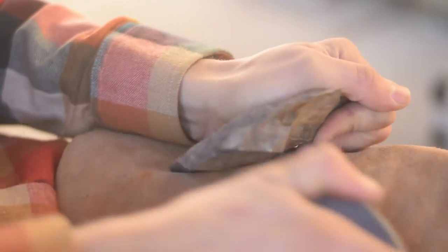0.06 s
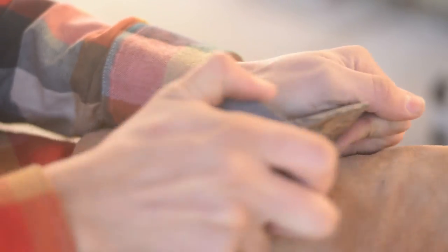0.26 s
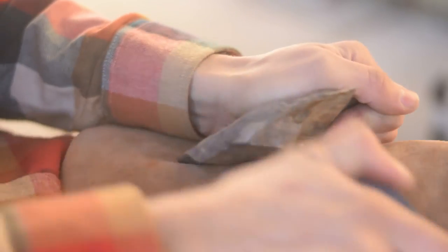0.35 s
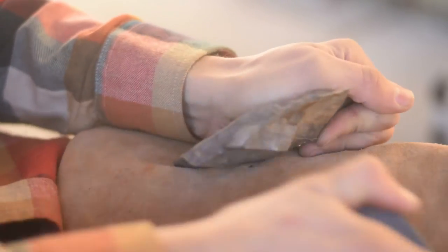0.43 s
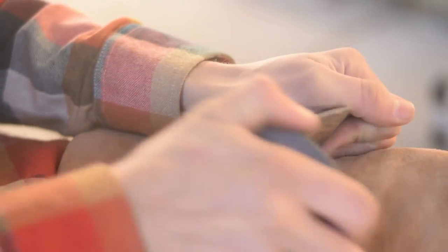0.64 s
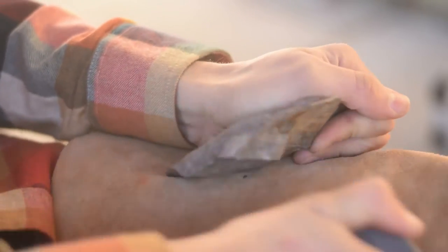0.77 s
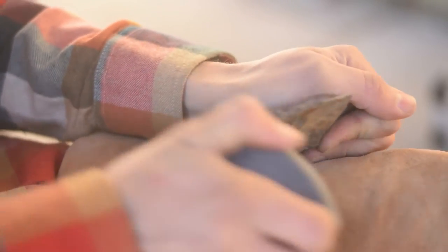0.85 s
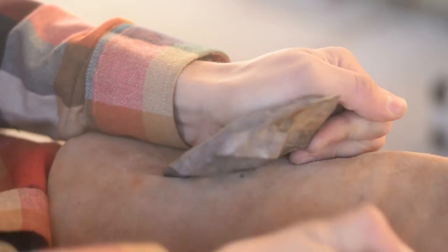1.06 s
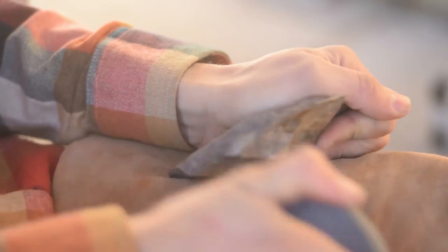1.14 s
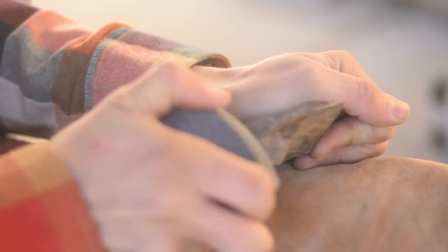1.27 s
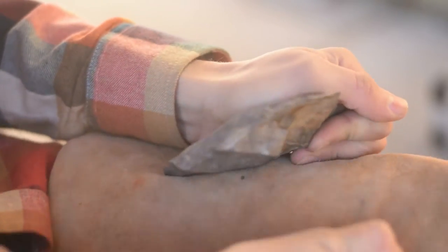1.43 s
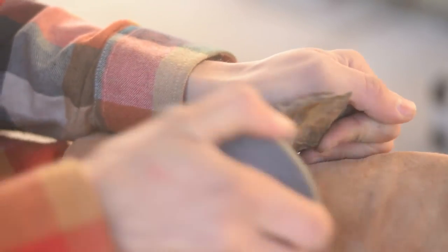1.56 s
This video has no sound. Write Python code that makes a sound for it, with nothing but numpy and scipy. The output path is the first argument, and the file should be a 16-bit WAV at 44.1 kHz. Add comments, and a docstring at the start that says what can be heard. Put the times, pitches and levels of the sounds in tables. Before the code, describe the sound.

A coarse stone knocks and rasps along another stone's edge in four short, gritty strokes, up close

```python
"""A rasp that has just ended leaves its echo in a small room with soft air noise and a low, wavering hum.
Then a coarse hand stone is swept four times along the edge of a stone blank held on the thigh.
Each stroke lands with a knock (short damped tones, overloading the close microphone) and skips lightly.
It then rasps along the edge (thousands of tiny clicks through the stones' resonances), with a few louder
snaps of coarse grains, and slips off with a thin, high ring. The room answers each sound."""
import sys
import numpy as np
from scipy import signal
from scipy.fft import rfft, irfft
from scipy.io import wavfile
from scipy.ndimage import uniform_filter1d

SR = 44100
rng = np.random.default_rng(int(sys.argv[2]) if len(sys.argv) > 2 else 0)


def to_wav(sig):
    """Store sig (one row per channel, or 1-D mono) as 16-bit WAV at the path in sys.argv[1].

    Samples outside -1..1 are clipped; the rate is SR.
    """
    pcm = np.clip(np.atleast_2d(sig), -1, 1) * 32767
    pcm = np.round(pcm).astype(np.int16)
    wavfile.write(sys.argv[1], SR, pcm.T)  # frames by channels


N = 70560
LEAD = SR // 5  # samples made before time zero and cut off at the end
T = np.arange(-LEAD, N) / SR  # time in seconds

# Still air of the room: hz, level_db (only the shape counts)
AIR_COLOUR = [(20, -13), (50, -5.5), (110, 3.5), (170, -1), (250, 0.5), (320, -4.5), (500, -7.5),
              (1000, -12.5), (2000, -12.5), (3500, -12.5), (6000, -20.5), (10000, -20.5), (16000, -27.5)]
# Slow rise and fall of the hum: time_s, level_db
HUM_LEVELS = [(0, -54), (.12, -47.5), (.33, -61), (.5, -46.5), (.68, -59.5), (.88, -39), (1.02, -50),
              (1.22, -43.5), (1.4, -57), (1.6, -46)]
# How long the room rings at each pitch: hz, t60_s (time to fall by 60 dB)
ROOM_DECAY = [(200, 0.1), (600, 0.55), (1800, .42), (4500, 0.39), (8000, 0.29), (13000, 0.097)]
# First contact of each stroke: start_s, level_db, pitch_hz, chink_db
KNOCKS = [(0.2189, 18, 1890, -41), (0.5809, 11, 1750, -12), (.9503, 16, 1853, -34), (1.3016, 17, 1940, -28)]
# Dull tones of the hand-held stones under a knock: pitch_hz, level_db, t60_s
KNOCK_MODES = [(112, -59, 0.01), (626, -38, 0.043), (1180, -28.5, 0.013), (1356, -22, 0.024),
               (3260, -23, 0.016)]
# Light touches between knock and rasp: start_s, length_s, level_db, sizzle_db
SKIPS = [(0.2543, 0.0094, -12, -13.5), (0.278, 0.0044, -23, -12), (0.304, 0.0036, -33, -12),
         (0.582, 0.026, -17, -21), (0.986, 0.004, -33, 0), (1.304, 0.0064, -6, -30),
         (1.332, 0.017, -27.5, -3)]
# Coarse grains that catch on the edge: start_s, level_db
CATCHES = [(0.3144, 2.5), (0.339, 1.5), (.347, -5), (.649, 0), (0.712, 1.5), (0.9912, -2), (1.354, -3),
           (1.373, 0), (1.39, -5)]
# Rasps along the edge: start_s, end_s, rise_s, level_db, force_gain_db, groan_db, grit_db,
# grit_growth_db, hollow_db, hollow_hz, sizzle_db, sizzle_hz, edge_ring_db
SCRAPES = [(-.11, -0.022, 0.013, -14, 1, -20, -14.5, 10, -11, 3350, -21, 7900, -1),
           (0.31, .382, 0.0014, -16, -5, -7, -12, 8, -2, 3247, -10.5, 8010, 1.5),
           (.638, 0.728, .008, -15.5, 1.5, -5.5, -14.5, 20, -10.5, 3240, -17.5, 8180, -4.5),
           (0.98, 1.065, 0.025, -13.5, 1, -12, -17.5, 20, -11, 3220, -14.5, 7870, -3),
           (1.336, 1.423, 0.02, -14.7, -1, -9, -21.5, 26, -9.5, 3270, -19, 7930, 3.5)]
# Sharper resonances of the stones under the rasp: pitch_hz, width_hz, level_db
STONE_MODES = [(584, 55, -23.5), (1558, 37, -15.5), (1863, 133, -10.5), (2480, 22.6, -22)]
# Colour of the rasping stones: hz, level_db
BODY_COLOUR = [(120, -40.5), (250, -17.5), (400, -14), (570, -7.5), (850, -11), (1150, -10), (1350, -14.5),
               (1520, -1), (1800, 0.5), (2150, -4), (2800, -11), (3600, -10.5), (4100, -25.5),
               (5600, -26.5), (9000, -36), (16000, -40)]
# Colour of grit that crumbles toward the end of the edge: hz, level_db
GRIT_COLOUR = [(60, -46), (300, -25), (2000, -2), (4300, 1.5), (5700, -8), (7000, -1.5), (8400, -14.5),
               (9200, -12.5), (10700, -12), (12400, -6), (13200, -18), (16000, -14)]
# Colour of the fine fizz all along the stroke: hz, level_db
FIZZ_COLOUR = [(60, -46), (2000, 1), (5600, -13.5), (6700, 5), (8200, -0.5), (9000, -21.5), (10600, -2),
               (11400, -24), (12100, 3), (13000, -16), (15000, -19), (16000, -11)]

AIR_DB, HUM_HZ, HUM_OCTAVE_DB = -44.5, 88.6, -54
ROOM_DB, ROOM_DELAY_S, EARLY_DB, EARLY_DECAY_S = -21, 0.0064, -15, 0.011
KNOCK_DECAY_S, KNOCK_RISE_S = 0.00057, 0.00008
BOUNCE_S, BOUNCE_DB, BOUNCE_DECAY_S = 0.00284, -21.5, 0.0028
THUMP_DB, THUMP_S, CRACK_DB, CRACK_S = -14, 0.00027, -14.5, 0.00061
CATCH_HZ = 1750
GRAINS_PER_S, GRAIN_SPREAD_DB, JUDDER_DB, JUDDER_S = 12000, 3.5, 2.66, 0.003
RELEASE_S, RASP_LOW_CUT_HZ = 0.00068, 194
BODY_DB, FIZZ_DB, NOTE_FADE_DB = -2.5, -17, 6
GROAN_HZ, GROAN_WIDTH_HZ, GROAN_FADE_DB = 583, 480, -12
HOLLOW_WIDTH_HZ, SIZZLE_WIDTH_HZ = 500, 910
EDGE_RING_HZ, EDGE_WIDTH_HZ, SLIP_S, EDGE_EARLY_DB = 12085, 140, 0.006, -31.5
CLIP_DB, LIMIT_DB, LIMIT_RECOVER_DB_PER_S, LIMIT_LAG_S, CUT_HZ = 4, 5.5, 237, 0.009, 15900


def amp(db):
    """Turns decibels into a plain multiplier."""
    return 10 ** (np.asarray(db) / 20)


def unit(x):
    """Scales a sound to an average strength (rms) of 1."""
    return x / np.sqrt(np.mean(x ** 2) + 1e-20)


def read(points, hz):
    """Reads between the points of a table, spacing frequency as a logarithm."""
    f, value = np.transpose(points)
    return np.interp(np.log(hz + 1), np.log(f + 1), value)


def colour(x, points):
    """Gives a sound the table's tone with a filter of unit energy that never acts ahead of time."""
    log_gain = np.log(amp(read(points, abs(np.fft.fftfreq(4096, 1 / SR)))))
    # the Hilbert transform supplies the phase that makes the filter respond at once
    taps = np.fft.ifft(np.exp(np.conj(signal.hilbert(log_gain)))).real[:2048]
    return signal.fftconvolve(x, taps / np.linalg.norm(taps))[:len(x)]


def ring(x, hz, width_hz, order=1):
    """Lets a sound excite a fading tone of unit energy; a higher order has steeper skirts."""
    t = np.arange(4096) / SR
    taps = t ** (order - 1) * np.exp(-np.pi * width_hz * t) * np.sin(2 * np.pi * hz * t)
    return signal.fftconvolve(x, taps / np.linalg.norm(taps))[:len(x)]


def wander(seconds):
    """Smooth random drift of rms 1; a longer time makes it slower."""
    f = np.fft.rfftfreq(len(T), 1 / SR)
    spectrum = rfft(rng.standard_normal(len(T))) * np.exp(-(f * seconds) ** 2)
    return unit(irfft(spectrum, len(T)))


def background():
    """Soft room noise, and a low hum with one overtone that wavers in pitch and level."""
    turn = 2 * np.pi * np.cumsum(HUM_HZ * (1 + 0.015 * wander(0.06))) / SR
    waver = amp(2 * wander(0.07))
    hum_level = amp(np.interp(T, *np.transpose(HUM_LEVELS)))
    hum = waver * (hum_level * np.sin(turn) + amp(HUM_OCTAVE_DB) * np.sin(2 * turn))
    air = unit(colour(rng.standard_normal(len(T)), AIR_COLOUR)) * amp(1.0 * wander(0.045))
    return np.sqrt(2) * hum + amp(AIR_DB) * air


def room(x):
    """Scattered reflections from lap and arms, then a short blurred tail that fades by pitch."""
    t = np.arange(SR) / SR
    hz, at, z = signal.stft(rng.standard_normal(SR), SR, nperseg=256)
    fading = z * amp(-60 * at / read(ROOM_DECAY, hz)[:, None])
    tail = signal.istft(fading, SR, nperseg=256)[1][:SR] * (t > ROOM_DELAY_S)
    early = rng.standard_normal(SR) * (rng.random(SR) < 2000 / SR)  # about 2000 reflections per second
    early = early * (t > 0.002) * np.exp(-t / EARLY_DECAY_S)
    taps = amp(ROOM_DB) * tail / np.linalg.norm(tail) + amp(EARLY_DB) * early / np.linalg.norm(early)
    return signal.fftconvolve(x, taps)[:len(x)]


def grains():
    """Tiny fractures of uneven size, clumped by the judder of the hand but steady in overall force."""
    size = amp(GRAIN_SPREAD_DB * np.minimum(rng.exponential(1, len(T)), 4))
    sign = rng.choice([-1, 1], len(T))
    happens = rng.random(len(T)) < GRAINS_PER_S / SR
    clicks = size * sign * happens * amp(JUDDER_DB * wander(JUDDER_S))
    # dividing by the running strength keeps the force steady
    return clicks / np.sqrt(abs(uniform_filter1d(clicks ** 2, size=1300)) + 1e-9)


def catches(snap_db=-13, snap_s=0.00088, clack_width_hz=900, clack_db=8):
    """Single coarse grains snap off: a noise burst and a small clack of the stone."""
    taps, bursts = np.zeros((2, len(T)))
    for start, db in CATCHES:
        taps += amp(db) * (np.arange(len(T)) == LEAD + round(start * SR))
        bursts += amp(db) * (T > start) * np.exp(-abs(T - start) / snap_s)
    noise = bursts * rng.standard_normal(len(T))
    snap = colour(noise, GRIT_COLOUR) + colour(noise, BODY_COLOUR)
    return amp(clack_db) * ring(taps, CATCH_HZ, clack_width_hz, order=2) + amp(snap_db) * snap


def skips(grit_db=-19, sizzle_hz=8000, fade_db=-8, groan_db=-8, hollow_db=-12, hollow_hz=3300, fizz_db=-1):
    """The rebounding stone brushes the edge for a moment, so a few grains break and fade."""
    clicks = grains()
    body, sizzle = np.zeros((2, len(T)))
    for start, length, db, sizzle_db in SKIPS:
        along = np.clip((T - start) / length, 0, 1)
        touch = clicks * amp(db + fade_db * along) * (along > 0) * (along < 1)
        body += touch
        sizzle += touch * amp(sizzle_db)
    low = amp(groan_db) * ring(body, GROAN_HZ, GROAN_WIDTH_HZ, order=3)
    low += amp(hollow_db) * ring(body, hollow_hz, HOLLOW_WIDTH_HZ, order=2)
    high = ring(sizzle, sizzle_hz, SIZZLE_WIDTH_HZ, order=2) + amp(fizz_db) * colour(sizzle, FIZZ_COLOUR)
    return colour(body, BODY_COLOUR) + amp(grit_db) * colour(body, GRIT_COLOUR) + low + high


def clack(start, hz, decay):
    """Stone on stone: a tone that starts almost at once and dies away."""
    t = np.maximum(T - start, 0)
    return (1 - np.exp(-t / KNOCK_RISE_S)) * np.exp(-t / decay) * np.sin(2 * np.pi * hz * t)


def knocks(chink_hz=8100, chink_decay=0.0025):
    """The stone lands, bounces once and leaves both stones ringing briefly."""
    out = np.zeros(len(T))
    crack = colour(rng.standard_normal(len(T)), GRIT_COLOUR)
    for start, db, hz, chink_db in KNOCKS:
        # log(1000) turns the time to fall by 60 dB into a decay time
        modes = sum(amp(d) * clack(start, f, t60 / np.log(1000)) for f, d, t60 in KNOCK_MODES)
        bounce = amp(BOUNCE_DB) * clack(start + BOUNCE_S, hz, BOUNCE_DECAY_S)
        out += amp(db) * (clack(start, hz, KNOCK_DECAY_S) + bounce + modes)
        push = np.maximum(T - start, 0) / THUMP_S
        out += amp(db + THUMP_DB) * push * np.exp(-push)
        out += amp(db + CRACK_DB) * crack * (T > start) * np.exp(-abs(T - start) / CRACK_S)
        edge = clack(start, EDGE_RING_HZ, 1 / (np.pi * EDGE_WIDTH_HZ))
        out += amp(chink_db) * (clack(start, chink_hz, chink_decay) + edge)
    return out


def scrapes():
    """Grains drive both stones: a low groan first, brighter grit later, a ringing edge at the slip."""
    clicks, fine = grains(), grains()
    body, groan, grit, fizz, edge, notes = np.zeros((6, len(T)))
    for (start, end, rise, db, push_db, groan_db, grit_db, growth_db,
         hollow_db, hollow_hz, sizzle_db, sizzle_hz, ring_db) in SCRAPES:
        along = np.clip((T - start) / (end - start), 0, 1)  # 0 at the start of the edge, 1 at its end
        press = np.clip((T - start) / rise, 0, 1)
        release = np.exp(-np.maximum(T - end, 0) / RELEASE_S)
        force = amp(db + push_db * (along - 0.5)) * press * release
        body += force * clicks
        groan += force * fine * amp(groan_db + GROAN_FADE_DB * along)
        grit += force * fine * amp(grit_db + growth_db * (along - 0.5))
        slip = amp(EDGE_EARLY_DB) + np.exp(np.minimum(T - end, 0) / SLIP_S)
        edge += force * fine * amp(ring_db) * slip
        # fizz and notes are strongest halfway along
        middle = force * clicks * amp(-NOTE_FADE_DB * (2 * along - 1) ** 2)
        fizz += middle
        notes += amp(hollow_db) * ring(middle, hollow_hz, HOLLOW_WIDTH_HZ, order=2)
        notes += amp(sizzle_db) * ring(middle, sizzle_hz, SIZZLE_WIDTH_HZ, order=2)
    notes += sum(amp(db) * ring(body, hz, width) for hz, width, db in STONE_MODES)
    notes += ring(groan, GROAN_HZ, GROAN_WIDTH_HZ, order=3)
    notes += ring(edge, EDGE_RING_HZ, EDGE_WIDTH_HZ)
    rasp = amp(BODY_DB) * colour(body, BODY_COLOUR) + colour(grit, GRIT_COLOUR)
    return rasp + amp(FIZZ_DB) * colour(fizz, FIZZ_COLOUR) + notes


def scene():
    """Knocks and rasps, close up in the room; the rasping small stones radiate little bass."""
    low_cut = signal.butter(2, RASP_LOW_CUT_HZ, "high", fs=SR, output="sos")
    rasp = signal.sosfilt(low_cut, scrapes() + skips() + catches())
    blows = knocks()
    echoes = room(rasp + amp(-5) * blows)
    return (rasp + blows + echoes + background())[None, LEAD:]


def record(dry):
    """The knocks clip, a late limiter ducks what follows them, then the highest treble is cut."""
    over_db = np.maximum(20 * np.log10(abs(dry[0]) + 1e-9) - LIMIT_DB, 0)
    # each peak is held, then let go at a steady number of decibels per second
    fall = np.arange(N) * LIMIT_RECOVER_DB_PER_S / SR
    held_db = np.maximum.accumulate(over_db + fall) - fall
    # smoothing makes the limiter react late
    r = np.exp(-1 / (LIMIT_LAG_S * SR))
    duck_db = signal.lfilter([1 - r], [1, -r], held_db)
    clipped = np.clip(dry * amp(-duck_db), -amp(CLIP_DB), amp(CLIP_DB))
    treble_cut = signal.firwin(255, CUT_HZ, window=("kaiser", 8), fs=SR)
    return signal.oaconvolve(clipped, treble_cut[None], "same")


dry = scene()
out = record(dry)
to_wav(out)
```